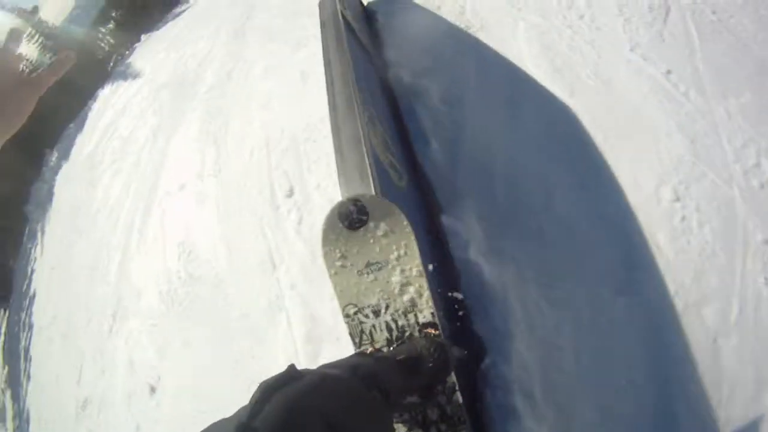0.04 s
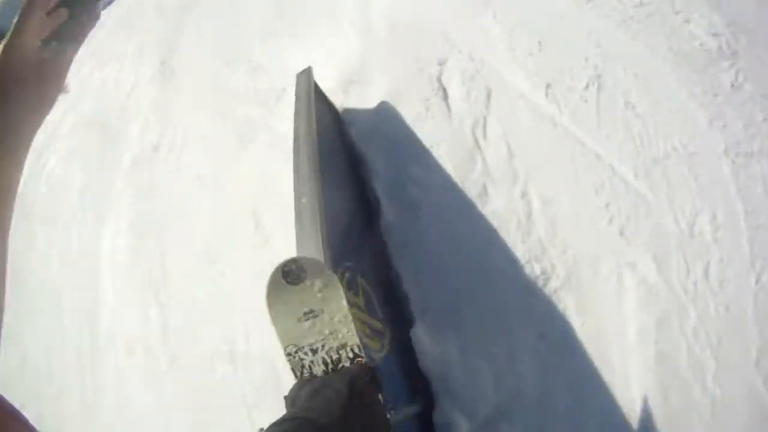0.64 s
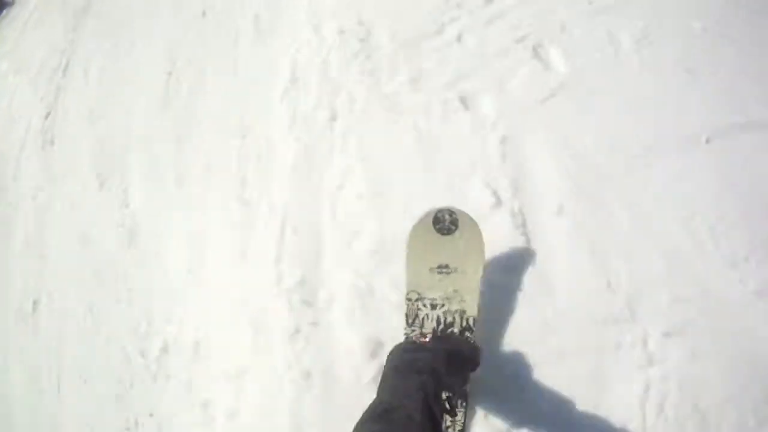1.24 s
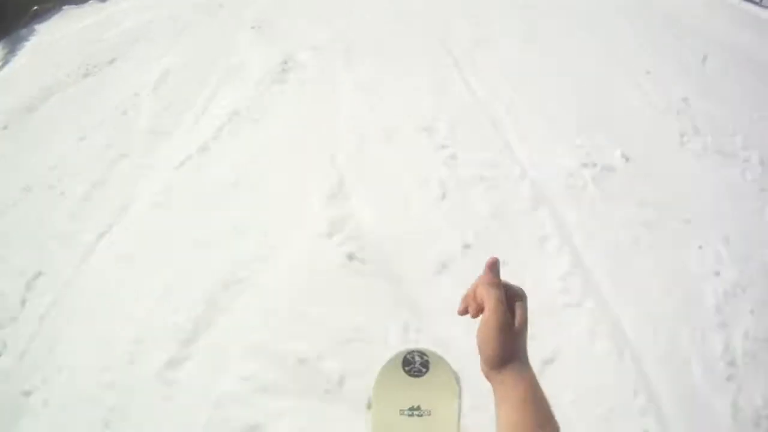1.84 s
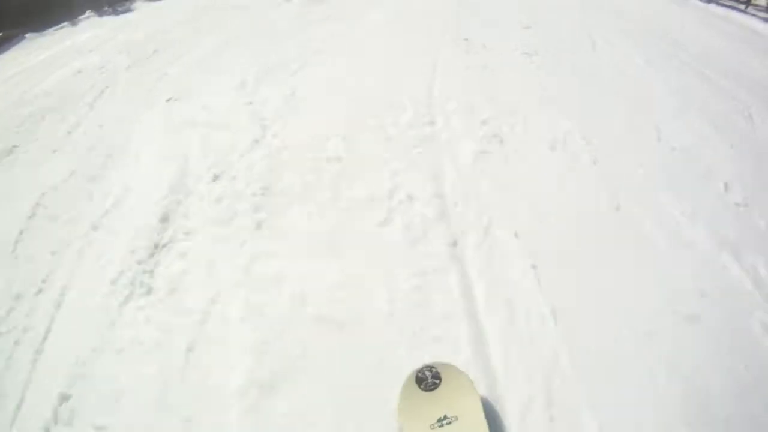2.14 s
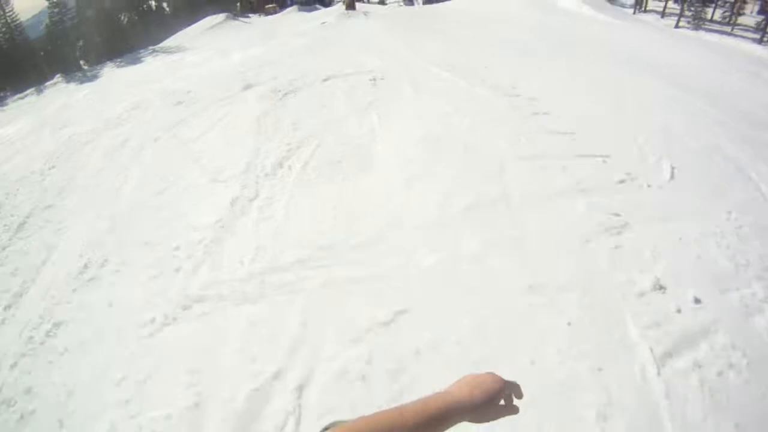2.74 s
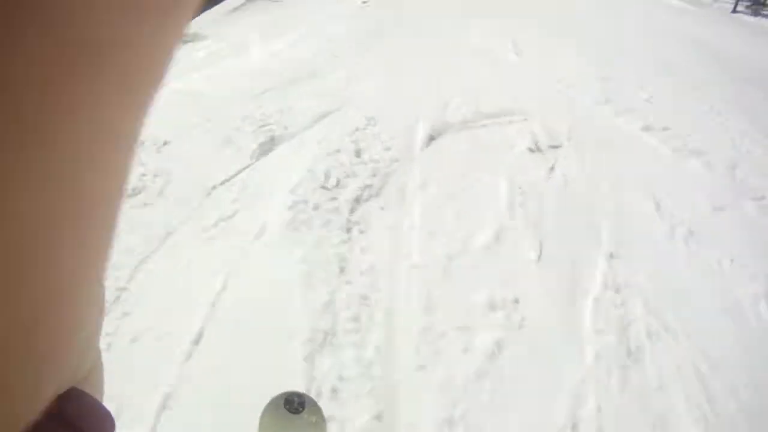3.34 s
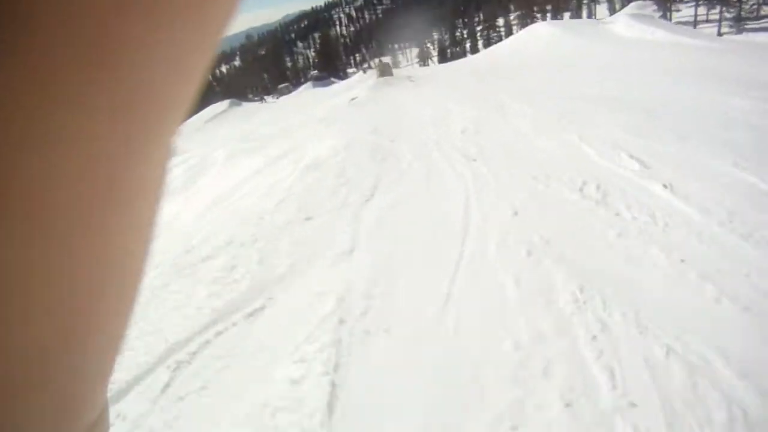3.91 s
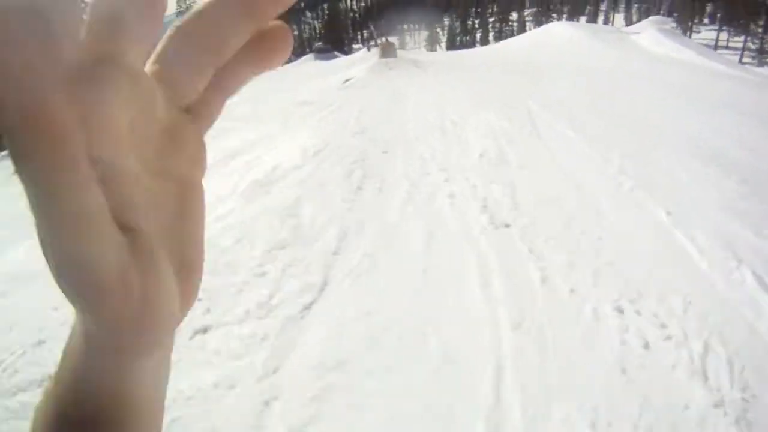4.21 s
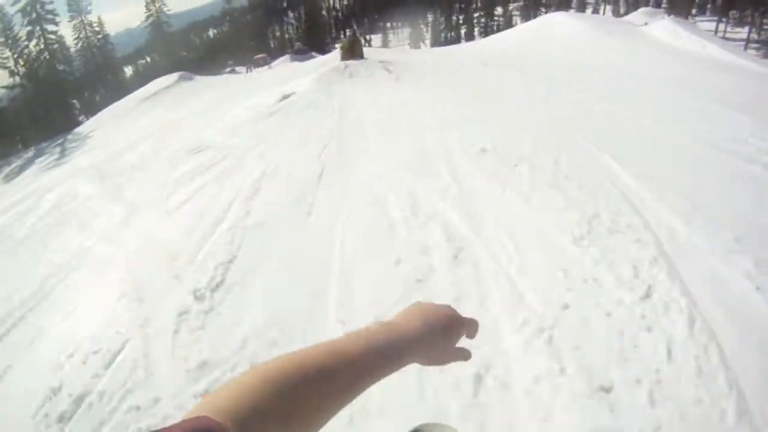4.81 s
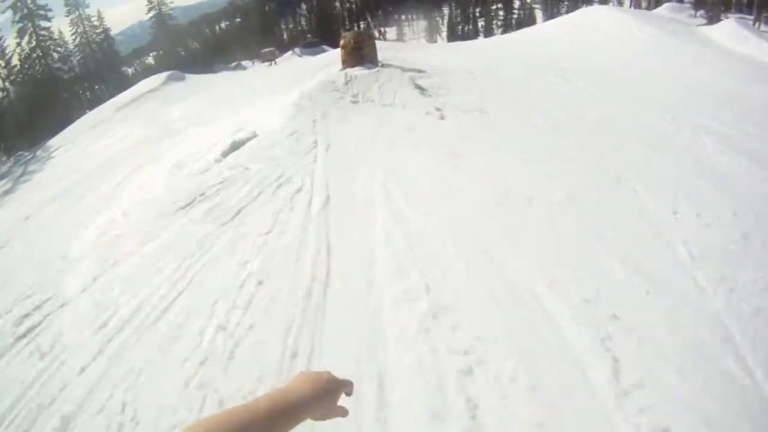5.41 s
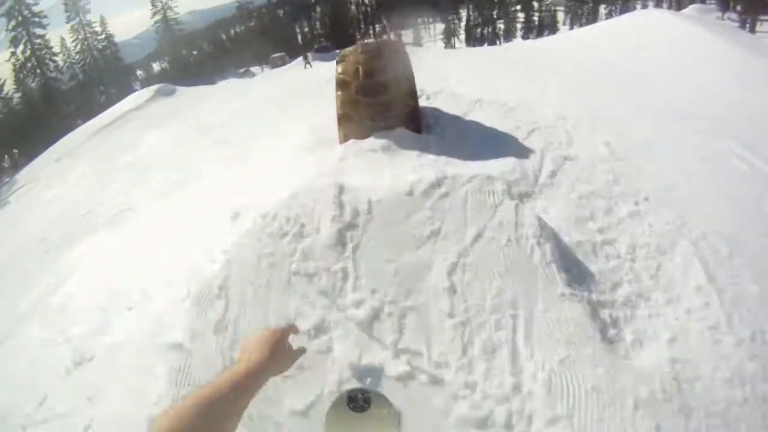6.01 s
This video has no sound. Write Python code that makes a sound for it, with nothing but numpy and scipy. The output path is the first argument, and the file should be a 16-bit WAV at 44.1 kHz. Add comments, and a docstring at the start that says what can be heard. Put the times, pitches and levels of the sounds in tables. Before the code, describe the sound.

A snowboard slaps onto a box with a hollow boom and crack at about 0.25 seconds, then scrapes along it, rising slightly in pitch until 0.6. Cloth brushes the microphone, and a second, louder boom lands at 0.75 amid clicks, low thumps and a gust. Another thump comes near 1.25. At about 1.4 the board meets packed snow with a bright hiss that eases into a soft, continuous crunch. From 3.1 to 3.5, clothing rasps on the microphone's plastic case with very loud, sharp taps and dull jolts, while the wind rumble swells. A second loud cluster of rubbing, knocks and buckle snaps hits around 4 seconds. Afterwards the board runs on more quietly, with a light edge rasp and a gust near 4.9, continuing to about 6 seconds. Everything sounds close and slightly ringing through the case, with low wind underneath.

```python
"""You hear a snowboard slap onto a box, scrape along it, drop off and run on over packed snow. The board booms
at each blow, the box with it while the board is on it; snow crunches under the base and hisses as the edge
throws it up. The rider wears the camera in a sealed plastic case: outside sounds come through its ringing
shell, clothing rubs and ticks on it, jolts thump it, and the wind rumbles around it."""
import sys
import numpy as np
from scipy import signal
from scipy.fft import rfft, irfft, next_fast_len
from scipy.io import wavfile
from scipy.ndimage import uniform_filter1d

SR = 44100
rng = np.random.default_rng(int(sys.argv[2]) if len(sys.argv) > 2 else 0)


def put_to_file(sound):
    """Save the sound as 16-bit audio at rate SR, in the file named by the first command-line argument."""
    columns = np.atleast_2d(sound).T  # one column per channel
    safe = np.clip(columns, -1, 1)
    whole_steps = np.round(safe * 32767)
    wavfile.write(sys.argv[1], SR, whole_steps.astype(np.int16))


N = 267246
TIME = np.arange(N) / SR

# Air flowing over the case. Each row: time in seconds, relative level in dB.
AIR_FLOW = [(0, -35.5), (.62, -42), (.8, -27.5), (1, -47.5), (1.42, -29.5), (1.65, -41.5), (2.1, -42),
            (2.6, -38.5), (2.9, -43), (3.25, -33.5), (3.55, -25.5), (3.96, -27), (4.06, -43.5), (4.56, -42),
            (4.75, -32.5), (5.1, -36.5), (5.35, -43.5), (6.06, -43.5)]
# Shoves on the case. Each row: time in seconds, strength in dB, pitch in Hz.
CASE_JOLTS = [(.773, -12, 34.3), (.807, -6, 48), (0.878, -9, 69.4), (1.259, -4.5, 81.4), (1.439, -19, 29),
              (3.153, -5.5, 75.6), (3.19, -13, 64), (3.362, -18.5, 83.5), (3.408, -20, 95), (3.52, -8, 72),
              (3.905, -14, 45), (3.938, -18, 61), (3.968, -11, 49.4), (3.994, -8, 63)]
# Cloth brushing the case. Each row: start in seconds, length in seconds, peak in dB, swell in dB,
# fade time in seconds, share of coarse rasp from 0 to 1.
CLOTH_STROKES = [(0.102, 0.034, -49, 6, .005, 0), (0.626, 0.068, -35.5, 21.5, 0.021, 0.06),
                 (0.714, 0.047, -37.5, 14, .008, 0.03), (0.794, 0.01, -25, 4.5, 0.02, 0),
                 (0.943, 0.52, -59, 10, 0.033, 0), (1.513, 0.14, -47, 1, 0.013, 0.24),
                 (3.142, 0.16, -24.5, 1.5, 0.068, 0.54), (3.496, .46, -46, 0.5, 0.0088, 0.17),
                 (3.958, 0.038, -19, 8, 0.0092, 0.28)]
# Taps on the case, some carrying the thud of the board's blows. Each row: time in seconds, ring level in dB,
# thud level in dB.
CASE_TAPS = [(.123, -53, -35.5), (.69, -21, -45), (0.75, -20.5, -37), (.785, -14.5, -17),
             (.873, -29.5, -33), (.968, -37.5, -39.5), (1.075, -33, -34.5), (1.182, -38.5, -43),
             (1.199, -46, -41), (1.237, -42, -18), (1.256, -33, -16.5), (1.344, -42, -47),
             (1.497, -27.5, -53), (1.652, -18.5, -51), (1.674, -39, -58), (3.1448, -7, -23),
             (3.2983, -4, -43), (3.3, 7, -32), (3.361, -10, -12.5), (3.384, -18.5, -14.5),
             (3.408, -44, -25), (3.503, -37, -26.5), (3.517, -26, -22.5), (3.9349, -0.5, -1),
             (3.9531, -5, -13), (3.99, -10, -11)]
# Sharp bright clicks on the case. Each row: time in seconds, strength in dB.
CASE_CLICKS = [(0.684, -21.5), (.741, -23), (0.801, -14.5), (0.887, -28.5), (1.09, -40), (1.118, -37),
               (1.287, -17), (3.1443, -9), (3.361, -11), (3.384, -17.5), (3.535, -23), (3.9981, 1),
               (4.01, -5), (4.0169, 2.5)]
# How loud the crunch and hiss are, faint before the landing.
# Each row: time in seconds, relative level in dB.
SNOW_LOUDNESS = [(0, -4.5), (1.25, -7.5), (1.75, -3.5), (2.25, 0), (2.53, 2.5), (2.8, 0.5), (3.05, -1.5),
                 (3.85, 1), (4.045, -0.5), (4.11, 2.5), (4.3, -1.5), (4.45, 2), (4.6, -2.5), (4.86, 4),
                 (5.25, -1), (5.63, 2.5), (5.92, 0), (6.06, 2.5)]
# The base sliding on the box. Each row: time in seconds, level in dB, scrape pitch in Hz.
BOX_SLIDE = [(0, -55, 1095), (.24, -87, 795), (.28, -39.5, 697), (.35, -47, 760), (.42, -41.5, 850),
             (.48, -42, 1000), (.54, -46, 1050), (.6, -59, 1150), (.68, -73, 1117)]
# Blows on the board. Each row: time in seconds, boom in dB, crack in dB, fade time in seconds.
BOARD_BLOWS = [(0.225, -41, -52, 0.013), (.2435, -15.5, -22.5, 0.015), (.254, -19, -15.5, 0.0054),
               (.268, -45, -47, 0.056), (.316, -31.5, -31.5, 0.0046), (0.337, -35.5, -38, 0.011),
               (.75, -10.5, -25.5, 0.0035), (1.235, -33.5, -38, .016), (1.28, -24, -41, 0.002),
               (1.379, -32, -42, 0.0035), (1.557, -39, -37, 0.0034)]

# Ringing peaks and dips in the sound. Each row: pitch in Hz, width in Hz, gain in dB.
OUTSIDE_PEAKS = [(1244, 124, 9.5), (2230, 193, 10), (2568, 150, 6.5), (3010, 97, 7.5), (3727, 440, 12.5),
                 (4894, 1140, 12.5), (6010, 160, -28.5), (7060, 1130, 8.5), (8280, 170, 11),
                 (9620, 1050, 10), (11580, 270, -9.5), (14400, 400, 6.5)]  # ringing peaks of outside sounds, with narrow gaps near 6 and 12 kHz
TOUCH_PEAKS = [(1230, 28, 13.5), (2354, 930, 21.5), (3600, 670, 10.5), (6060, 500, -20), (8320, 100, 15.5),
               (9730, 1170, 20), (11850, 1200, -24), (13840, 240, 8.5)]  # ringing peaks of touches, also with gaps near 6 and 12 kHz
BOARD_PEAKS = [(315, 92, -3.5), (563, 590, -18.5), (771, 168, 3), (1118, 175, -3)]  # the board's low pitches

# Tone colours, from bass to treble. Each row: frequency in Hz, relative level in dB.
RUMBLE_COLOUR = [(10, -14), (22, 7), (33, 1.5), (50, -1.5), (80, -21), (150, -38), (700, -47), (4000, -92)]  # big swirls of air
FLUTTER_COLOUR = [(20, -31), (45, -3), (65, 5), (90, -4.5), (125, -6.5), (180, -17.5), (300, -29.5),
                  (700, -48), (4000, -106)]  # small swirls of air
BRUSH_COLOUR = [(30, -2.5), (200, 6.5), (500, -9), (800, -1), (1800, -4), (3000, -23.5), (4500, -21),
                (8000, -24), (15000, -12.5)]  # cloth brushing softly
RASP_COLOUR = [(30, -29), (250, -21), (500, -39), (850, 4), (1700, -8), (2500, -0.5), (3300, 2.5),
               (4500, 0.5), (6000, 4), (7500, 2), (10000, -9), (15000, -3)]  # cloth pressed hard
RING_COLOUR = [(30, -33), (400, -25), (900, -6), (1400, 0), (2000, 0), (2600, -7.5), (3100, -35.5),
               (4500, -17), (8000, -20.5), (15000, -2)]  # the bright ring of a tap
THUD_COLOUR = [(60, -13.5), (185, 13.5), (420, -4), (850, -4.5), (1300, -6.5), (2000, -19), (6000, -28)]  # the dull thud of a tap
SNAP_COLOUR = [(30, -14), (500, -7.5), (2000, 2.5), (3000, -6.5), (3700, 0.5), (5000, -9.5), (6000, -21),
               (8300, -7), (10500, -16), (15000, -20)]  # sharp clicks on the case
CRUNCH_COLOUR = [(30, -9.5), (110, -4.5), (170, 8.5), (280, 2), (450, -1.5), (800, 0.5), (1500, -4),
                 (2500, -6.5), (4200, -23), (7000, -23.5), (15000, -19)]  # crushed snow
SPRAY_COLOUR = [(300, -30), (1500, 9.5), (3000, 3.5), (4800, 2), (7000, 3.5), (10000, -8), (15000, -21)]  # thrown snow
CRACK_COLOUR = [(100, 2), (1000, -4), (1500, -1), (2400, 2.5), (4500, -11), (9000, -12), (15000, -9.5)]  # the crack of the board's edge


def from_db(db):
    """Turn decibels into a number to multiply by."""
    return 10 ** (np.asarray(db) / 20)


def unit_level(x):
    """Scale a signal so that its average (rms) level is 1."""
    return x / np.sqrt(np.mean(x ** 2) + 1e-20)


def curves(rows):
    """Join rows that start with a time by straight lines, giving one curve per other column."""
    times, *columns = np.transpose(rows)
    return [np.interp(TIME, times, column) for column in columns]


def drift(per_s):
    """A random wander of typical size 1 that heads for a new value per_s times a second."""
    points = rng.standard_normal(4000)
    return unit_level(np.interp(TIME * per_s, np.arange(len(points)), points))


def coloured(x, colour):
    """Give a signal a tone colour, with a filter that never rings ahead of the sound."""
    size = 2 * next_fast_len(N // 2 + 8192)
    hz, db = np.transpose(colour)
    bin_hz = np.maximum(np.fft.rfftfreq(size, 1 / SR), 1)
    gain = from_db(np.interp(np.log(bin_hz), np.log(hz), db))
    cepstrum = irfft(np.log(gain))
    cepstrum[1:size // 2] *= 2  # fold the filter's early half onto its late half (minimum phase)
    cepstrum[size // 2 + 1:] = 0
    return irfft(rfft(x, size) * np.exp(rfft(cepstrum)))[:N]


def through(x, peaks):
    """Pass a signal through a list of peaks and dips, one after another."""
    for hz, width, db in peaks:
        gain, spread = from_db(db / 2), np.pi * width / SR
        tuning = -2 * np.cos(2 * np.pi * hz / SR)
        forward = [1 + spread * gain, tuning, 1 - spread * gain]
        feedback = [1 + spread / gain, tuning, 1 - spread / gain]
        x = signal.lfilter(forward, feedback, x + 1e-18)
    return x


def resonate_twice(x, hz, width_hz):
    """Keep the sound near one pitch by passing it twice through the same resonance."""
    radius = np.exp(-np.pi * width_hz / SR)
    forward = np.array([1, 0, -1]) * (1 - radius ** 2) / 2
    feedback = [1, -2 * radius * np.cos(2 * np.pi * hz / SR), radius ** 2]
    return signal.lfilter(forward, feedback, signal.lfilter(forward, feedback, x))


def hollow(hz, width_hz):
    """Hollow-sounding noise around one pitch."""
    return unit_level(resonate_twice(rng.standard_normal(N), hz, width_hz))


def steady(x, window=128):
    """Even out the loudness of a noise, leaving its colour."""
    power = np.abs(signal.hilbert(x, next_fast_len(N))[:N]) ** 2
    return x / np.sqrt(uniform_filter1d(power, window) / 2 + 1e-12)


def chatter(colour, peaks=()):
    """Even noise that stands for the rapid rattling inside one contact."""
    return steady(through(coloured(rng.standard_normal(N), colour), peaks))


def grains(colour, peaks, per_s, spread_db):
    """Tiny slips of uneven size at random moments, shaped by a colour and by peaks and dips."""
    sizes = rng.standard_normal(N) * from_db(spread_db * rng.standard_normal(N))
    slips = unit_level(sizes * (rng.random(N) < per_s / SR))
    return unit_level(through(coloured(slips, colour), peaks))


def decays(rows, attack_s=0.00056):
    """A loudness curve of hits that die away. Each row: seconds, level in dB, fade time in seconds."""
    loudness = np.zeros(N)
    for start, db, fade_s in rows:
        tail = loudness[int((start - attack_s) * SR):][:SR // 2]
        age = TIME[:len(tail)]
        tail += from_db(db) * np.exp(-age / fade_s) * (1 - np.exp(-(age / attack_s) ** 2))
    return loudness


def contacts(rows, medium_fade_s, medium_db, halving_db=21.5):
    """Like decays, but harder hits are shorter. Each row: seconds, level in dB, force in dB."""
    return decays([(start, db, medium_fade_s * 2 ** ((medium_db - force_db) / halving_db))
                   for start, db, force_db in rows])


def wind(rumble_boost_db=3.0, breeze_db=-39.5, flutter_db=-44, flutter_follows=0.69, gust_db=1.0):
    """Big swirls rumble around the case, small ones flutter at its corners; jolts leave it shaking."""
    shudder_offset_db, shudder_fade_s = -13.5, 0.018
    flow_db, = curves(AIR_FLOW)
    rumble = unit_level(coloured(rng.standard_normal(N), RUMBLE_COLOUR))
    rumble *= from_db(flow_db + rumble_boost_db)
    shudder = decays([(start, db + shudder_offset_db, shudder_fade_s) for start, db, _ in CASE_JOLTS])
    swirls = from_db(flutter_db + flutter_follows * (flow_db - breeze_db))
    flutter = unit_level(coloured(rng.standard_normal(N), FLUTTER_COLOUR)) * np.hypot(swirls, shudder)
    return (rumble + flutter) * from_db(gust_db * drift(per_s=12))


def jolts(length_cycles=0.45):
    """A shove bends the case: the air inside swings once up and down, making a thump."""
    thumps = np.zeros(N)
    for centre, db, hz in CASE_JOLTS:
        near = np.abs(TIME - centre) < .1
        cycles = (TIME[near] - centre) * hz
        swing = np.sqrt(2) * np.sin(2 * np.pi * cycles) / np.cosh(2 * cycles / length_cycles)
        thumps[near] -= from_db(db) * swing
    return thumps


def cloth(catch_db=2.24, attack_s=0.0014, rasp_fade_s=0.066):
    """Fabric catches and slips on the case: each stroke swells, then lets go. Pressed hard, it rasps."""
    soft_power, coarse_power = np.zeros((2, N))
    for start, length, peak_db, swell_db, fade_s, rasp_share in CLOTH_STROKES:
        share_left = np.clip((start + length - TIME) / length, 0, 1)
        since_end = np.maximum(TIME - start - length, 0)
        onset = np.clip((TIME - start) / attack_s, 0, 1)
        fade = np.exp(-np.minimum(since_end / fade_s, 20))
        power = onset * (from_db(peak_db - swell_db * share_left) * fade) ** 2
        rasping = rasp_share * np.exp(-since_end / rasp_fade_s)  # softens as the pressure comes off
        coarse_power += power * rasping
        soft_power += power * (1 - rasping)
    brush = np.sqrt(soft_power) * grains(BRUSH_COLOUR, TOUCH_PEAKS, per_s=5000, spread_db=0)
    rasp = np.sqrt(coarse_power) * grains(RASP_COLOUR, TOUCH_PEAKS, per_s=9000, spread_db=4)
    return (brush + rasp) * from_db(catch_db * drift(per_s=140))


def clothing_ticks(medium_db=-20.5, tap_fade_s=0.0029, snap_fade_s=0.0021, snap_offset_db=-4):
    """Hard bits of clothing tap the case, and the board's blows thud through it, so that it rings, thuds and
    knocks; sharp clicks snap on it."""
    # Loose clothing adds faint random taps as the rider drops and lands.
    loose_from_s, loose_until_s, loose_per_s, loose_db, scatter_db = 1.3, 1.68, 40, -44, 2
    loose = (rng.random(N) < loose_per_s / SR) & (TIME > loose_from_s) & (TIME < loose_until_s)
    faint_db = (loose_db + scatter_db * rng.standard_normal(N))[loose]
    starts, ring_db, thud_db = np.hstack([np.transpose(CASE_TAPS), [TIME[loose], faint_db, faint_db]])
    force_db = np.maximum(ring_db, thud_db)
    knock_db = -33 + 1.79 * (thud_db - medium_db)  # hard taps bring out a hollow knock
    ring = chatter(RING_COLOUR, TOUCH_PEAKS)
    thud = chatter(THUD_COLOUR)
    knock = steady(hollow(hz=805, width_hz=370))
    taps = sum(noise * contacts(zip(starts, db, force_db), tap_fade_s, medium_db)
               for noise, db in [(ring, ring_db), (thud, thud_db), (knock, knock_db)])
    snaps = [(start, db + snap_offset_db, db) for start, db in CASE_CLICKS]
    return taps + chatter(SNAP_COLOUR) * contacts(snaps, snap_fade_s, medium_db)


def snow(crunch_base_db=-47, spray_base_db=-57.5, spray_follows=2.02, flicker_db=1.0):
    """Crystals crush under the base; the edge rasps and throws a bright spray, most of all on landing."""
    touchdown_s, sink_in_s, plume_peak_db, plume_fade_s = 1.427, .12, 16.5, 0.47
    run_up_s, fade_db_per_s = 4.1, 2.5  # the crunch fades on the run-up to the next jump
    carve_s, carve_length_s, carve_db = 4.89, 0.3, -52  # one hard turn makes the edge rasp
    box_spray_db = -79  # a little loose snow is thrown before the landing
    loudness_db, = curves(SNOW_LOUDNESS)
    crunch_db = crunch_base_db + loudness_db - fade_db_per_s * np.maximum(TIME - run_up_s, 0)
    landed = np.clip(1 + (TIME - touchdown_s) / sink_in_s, 0, 1)
    plume_db = plume_peak_db * np.exp(-np.maximum(TIME - touchdown_s, 0) / plume_fade_s)
    riding_db = spray_base_db + spray_follows * loudness_db + plume_db
    spray_db = landed * riding_db + (1 - landed) * box_spray_db
    crunch = grains(CRUNCH_COLOUR, OUTSIDE_PEAKS, per_s=20000, spread_db=3) * from_db(crunch_db)
    hiss = through(coloured(rng.standard_normal(N), SPRAY_COLOUR), OUTSIDE_PEAKS)
    spray = unit_level(hiss) * from_db(spray_db)
    carve_swell = np.exp(-2 * ((TIME - carve_s) / carve_length_s) ** 2)
    carve = hollow(hz=2430, width_hz=650) * from_db(carve_db) * carve_swell
    return (crunch + spray + carve) * from_db(flicker_db * drift(per_s=25))


def box_slide(wander_hz=260, hiss_db=-7, judder_db=2.0):
    """The base scrapes roughly along the box, rising in pitch toward its end."""
    level_db, pitch_hz = curves(BOX_SLIDE)
    lowpass = signal.butter(2, wander_hz, fs=SR, output="sos")
    wander = signal.sosfilt(lowpass, rng.standard_normal((2, N)))
    phase = 2 * np.pi * np.cumsum(pitch_hz) / SR
    scrape = unit_level(wander[0] * np.cos(phase) + wander[1] * np.sin(phase))  # noise around the pitch
    loudness = from_db(level_db + judder_db * drift(per_s=90.4))
    hiss = from_db(hiss_db) * chatter(CRACK_COLOUR, OUTSIDE_PEAKS)
    return loudness * (scrape + hiss)


def board_blows():
    """Each blow makes the board boom at its low pitches, with a bright crack from the edge."""
    clatter = rng.standard_normal(N)
    ringing = sum((-1) ** k * from_db(db) * resonate_twice(clatter, hz, width)
                  for k, (hz, width, db) in enumerate(BOARD_PEAKS))
    boom_loudness = decays([(start, db, fade_s) for start, db, _, fade_s in BOARD_BLOWS])
    crack_loudness = decays([(start, db, fade_s) for start, _, db, fade_s in BOARD_BLOWS])
    return steady(ringing) * boom_loudness + chatter(CRACK_COLOUR, OUTSIDE_PEAKS) * crack_loudness


def scene(side_db=-34):
    """Add up all the sounds; left and right are the same but for a tiny phase shift."""
    inside = snow() + board_blows() + box_slide() + cloth() + clothing_ticks() + jolts() + wind()
    side = from_db(side_db) * signal.hilbert(inside, next_fast_len(N))[:N].imag
    return np.array([inside + side, inside - side])


def record(dry, sizzle_hz=12000, sizzle_db=-44, cutoff_hz=15500):
    """A faint sizzle flickers with the bass, the hardest taps overload, and the top treble is cut."""
    bass = signal.sosfilt(signal.butter(2, [50, 300], "band", fs=SR, output="sos"), dry)
    sizzle = from_db(sizzle_db) * bass * np.cos(2 * np.pi * sizzle_hz * TIME)
    overloaded = np.clip(dry + sizzle, -1, 1)
    return signal.sosfilt(signal.ellip(12, .2, 90, cutoff_hz, fs=SR, output="sos"), overloaded)


dry = scene()
out = record(dry)
put_to_file(out)
```